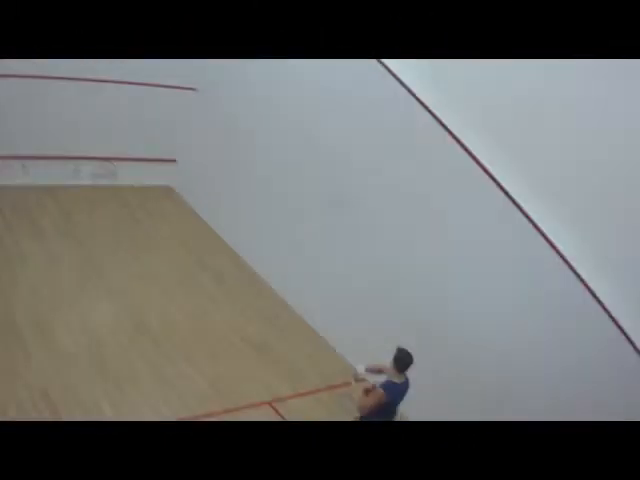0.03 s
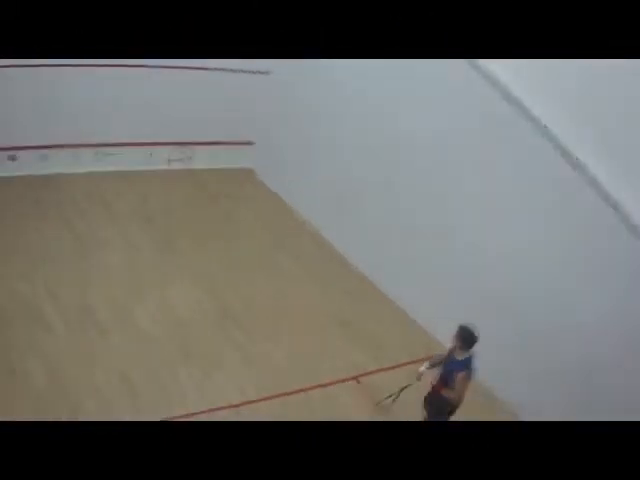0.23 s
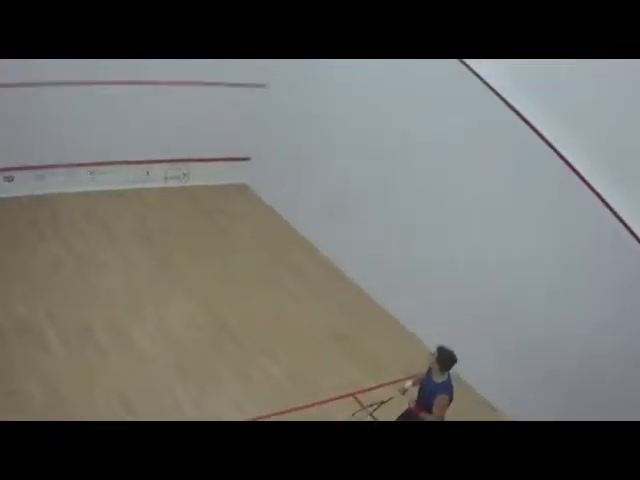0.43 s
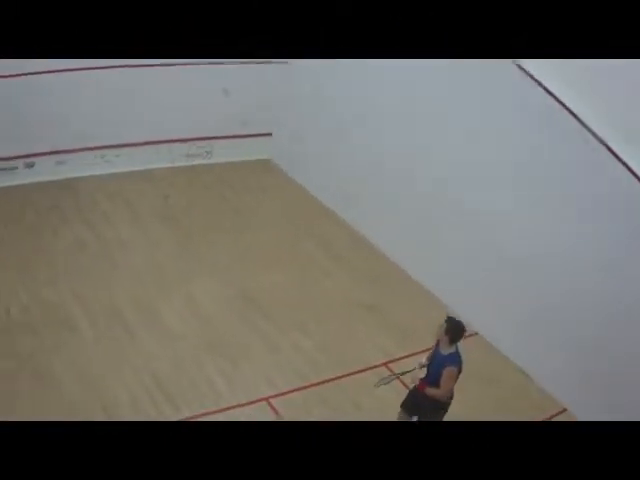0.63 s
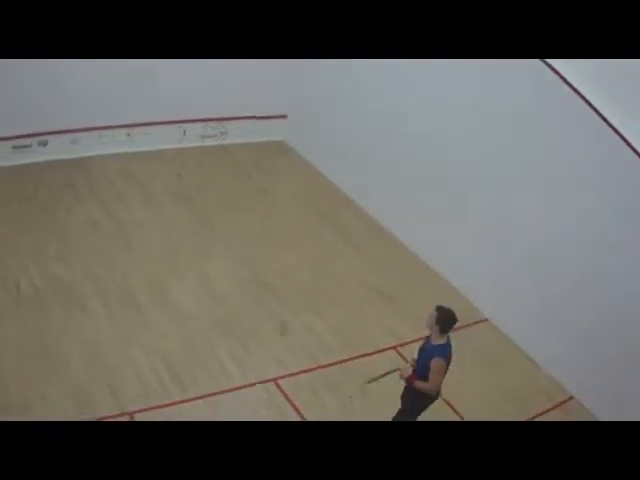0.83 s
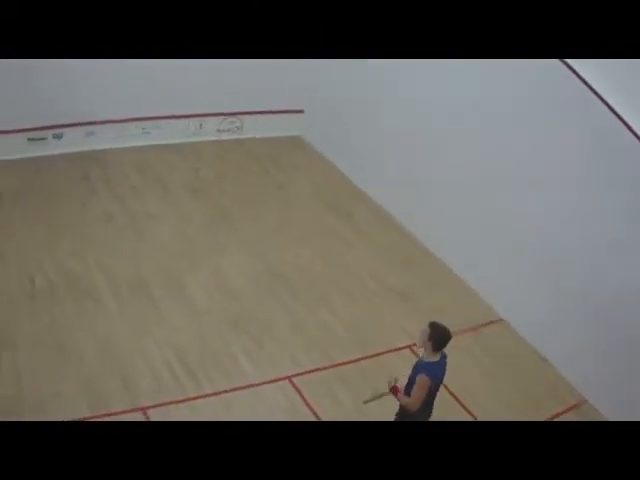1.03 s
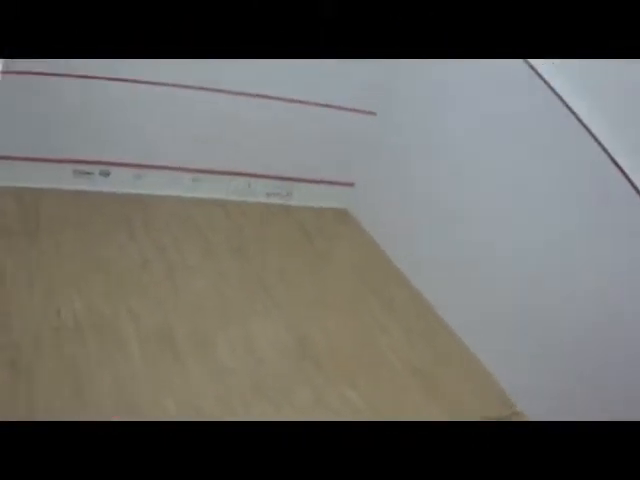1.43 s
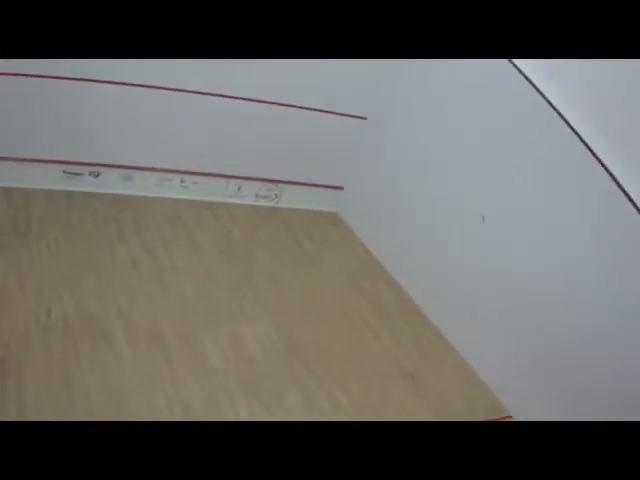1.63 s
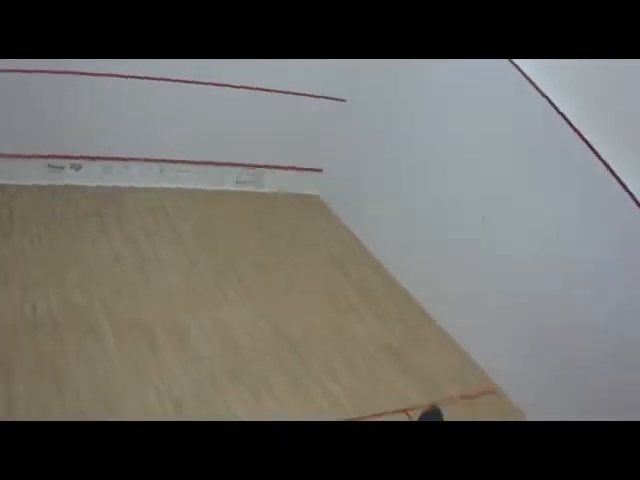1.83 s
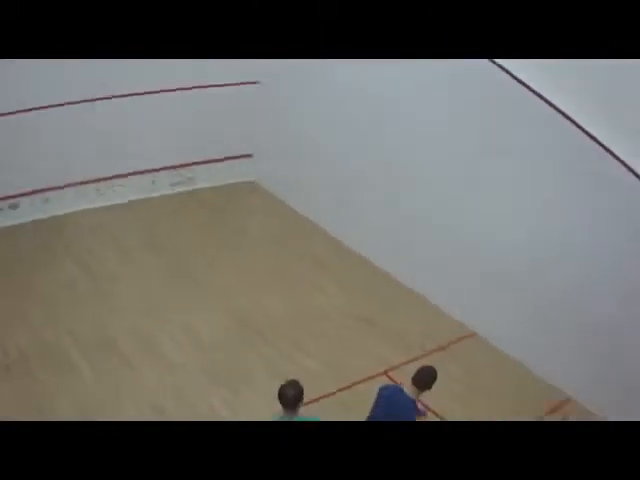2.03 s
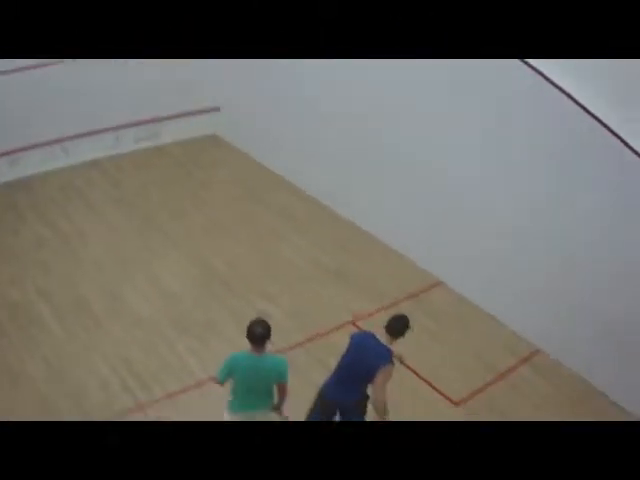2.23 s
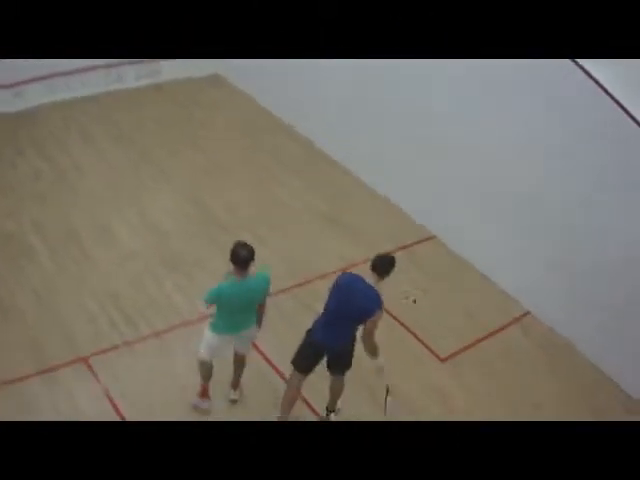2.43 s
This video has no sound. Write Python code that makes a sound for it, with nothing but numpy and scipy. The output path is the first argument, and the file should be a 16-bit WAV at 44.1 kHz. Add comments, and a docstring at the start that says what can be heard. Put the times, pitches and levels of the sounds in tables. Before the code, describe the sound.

Squash rally with racket thwacks, loud ball slams and shoe squeaks ringing around an indoor court.

```python
"""First comes the thwack of a racket on a squash ball, over faint ventilation and a barely audible thud.
The strings ring on each of three strokes; twice the ball slams into the front wall with a crack
and a short ping of its hollow shell. The wooden floor adds light knocks and an echo; soles squeak.
Heard from the gallery behind the court, the hard walls throw back distinct echoes,
then a long, bright wash of reverberation."""
import sys
import numpy as np
from scipy import signal
from scipy.fft import rfft, irfft
from scipy.io import wavfile

SR = 44100
rng = np.random.default_rng(int(sys.argv[2]) if len(sys.argv) > 2 else 0)


def materialize(psi):
    """Save the field psi as 16-bit PCM at rate SR to the path in sys.argv[1].

    A 1-D psi becomes a single channel; in a 2-D psi each row is a channel.
    """
    bounded = np.clip(np.atleast_2d(psi).T, -1, 1)
    quanta = np.round(bounded * 32767).astype(np.int16)
    wavfile.write(sys.argv[1], SR, quanta)


N = 110250
T = np.arange(N) / SR


def undb(db):
    """Turn decibels into a number to multiply a sound by."""
    return 10 ** (np.asarray(db) / 20)


def unit(x):
    """Scale a sound to an energy of one."""
    return x / np.sqrt(np.sum(x ** 2))


def curve(hz, points):
    """Join (frequency, value) points with straight lines, giving each octave equal room."""
    f, values = np.array(points, float).T
    return np.interp(np.log(np.maximum(hz, 1)), np.log(f), values)


def fade(t60):
    """A smooth fade that drops 60 dB in t60 seconds."""
    return np.exp(-np.log(1000) * T / t60)


def delay(x, s):
    """Start a sound s seconds later."""
    return np.concatenate([np.zeros(max(int(s * SR), 0)), x])[:N]


def convolve(x, response):
    """Pass a sound through a filter or a room, given how that answers a click."""
    return signal.fftconvolve(x, response)[:N]


def colour(points, bass_db=0, treble_db=0, bass_hz=600, treble_hz=3950, size=2048):
    """A click with the given tone colour, its bass and treble turned up or down."""
    hz = np.arange(size // 2 + 1) * SR / size
    gain = undb(curve(hz, points))
    bass = 1 / (1 + (hz / bass_hz / np.sqrt(2)) ** 4)
    treble = 1 - 1 / (1 + (hz * np.sqrt(2) / treble_hz) ** 4)
    gain = gain / np.sqrt(np.mean(gain ** 2)) * undb(bass_db * bass + treble_db * treble)
    # Pack the click's energy at its start without changing its colour.
    cepstrum = irfft(np.log(gain))
    cepstrum[1:size // 2] *= 2
    cepstrum[size // 2 + 1:] = 0
    return irfft(np.exp(rfft(cepstrum)))


def burst(fade_s):
    """The short puff of noise from a hit, evened out from low to high and then faded again."""
    spectrum = rfft(rng.standard_normal(N) * fade(fade_s))
    even = irfft(spectrum / (np.abs(spectrum) + 1e-9), N)
    return unit(even * fade(2 * fade_s))


def resonance(x, centre_hz, width_hz, attack_s=0.0014):
    """Keep the part of a sound near one pitch, with a soft start and an energy of one."""
    hz = np.arange(N // 2 + 1) * SR / N
    band = irfft(rfft(x) * np.exp(-((hz - centre_hz) / width_hz) ** 2), N)
    return unit(band * (1 - np.exp(-T / attack_s)))


# How long low and high sounds linger in the court: f/Hz, time to drop 60 dB/s
COURT_DECAY = [(80, 0.67), (300, 2.77), (1000, 2.8), (2000, 2.63), (3500, 2.72), (5400, 1.94), (7700, 1.42),
               (11000, 1.12), (15500, 1.34)]

def court(build_s=0.022, unevenness=0.32, early_db=-11):
    """Reverberation: countless reflections build up, fall quickly at first, and lose their treble."""
    steps = np.repeat(rng.standard_normal(N // 64 + 1), 64)[:N]
    strength = np.exp(unevenness * steps * fade(2))
    spectrum = rfft(rng.standard_normal(N) * strength)
    hz = np.arange(len(spectrum)) * SR / N
    centres = [f for f, _ in COURT_DECAY]
    tail = 0
    for weights, (_, t60) in zip(np.eye(len(centres)), COURT_DECAY):
        band = curve(hz, list(zip(centres, weights)))
        tail += irfft(spectrum * band, N) * fade(t60)
    swell = 1 - np.exp(-T / build_s)
    return unit(tail * swell * (1 + undb(early_db) * fade(1.0)))


# Tone colour of the moving air: f/Hz, level/dB
AIR_COLOUR = [(25, -24), (100, -6), (300, -4.5), (600, -1), (1200, -5.5), (2600, -8), (4000, -14),
              (6300, -19.5), (7800, -31), (9000, -39.5), (10500, -30), (13500, -24.5), (15500, -22)]

def ventilation(air_db=-57, ring_db=-67, ring_hz=4549):
    """Air rushes steadily with a thin hiss on top, while a faint high ring dies away."""
    air = undb(air_db) * convolve(rng.standard_normal(N), colour(AIR_COLOUR))
    return air + undb(ring_db) * fade(1.9) * np.sin(2 * np.pi * ring_hz * T)


def hand_bump(peak_s=0.07, half_width_s=0.022, hz=49.7, db=-66):
    """A hand nudges the camera and makes a soft, low thud."""
    age = T - peak_s
    return undb(db) * np.exp(-(age / half_width_s) ** 2) * np.sin(2 * np.pi * hz * age)


# Racket strokes: t/s, level/dB, direct sound/dB, bass/dB, treble/dB, string ring/dB,
# length of the direct sound/s, wait for the court's answer/s
STROKES = [(0.072, -3.5, 1.5, 1, -1, -2, 0.023, .025), (1.0246, -2, -1.5, 1.5, 2.5, -17, .004, 0.02),
           (2.200, -14, -1.5, 2.5, -0.5, 0.5, 0.0083, .025)]
# Notes of the strings and frame: f/Hz, level/dB, time to drop 60 dB/s
RACKET_NOTES = [(374, -11.5, 0.078), (804, -11, .035), (919, -3.5, 0.072), (1080, -7, .04),
                (1670, 2, 0.042), (2310, -7, 0.041), (3005, 0.5, 0.035), (5200, -17, .02)]
# Tone colours of the blow and of its bright tick: f/Hz, level/dB
BLOW_COLOUR = [(50, -33.5), (150, -19), (400, 1), (650, -6), (1000, 5), (1350, -10.5), (2800, -3.5),
               (3400, -13), (4400, -12.5), (5400, -10.5), (7000, -26), (9000, -45), (11500, -42.5),
               (15500, -37)]
TICK_COLOUR = [(500, -20), (3000, -17), (6500, 1), (9000, -4), (13000, -8), (15500, -22)]

def racket():
    """The ball thwacks the strings; floor and side wall smear the blow, then the far court answers."""
    string_band = signal.butter(3, (290, 6000), "band", fs=SR, output="sos")
    notes = sum(undb(db) * fade(t60) * np.sin(2 * np.pi * hz * T) for hz, db, t60 in RACKET_NOTES)
    ring = unit(signal.sosfilt(string_band, notes))
    out = 0
    for s, db, direct_db, bass_db, treble_db, ring_db, length_s, wait_s in STROKES:
        strings = undb(ring_db) * ring
        tick = undb(treble_db - 37.5) * convolve(burst(0.041), colour(TICK_COLOUR))
        blow = colour(BLOW_COLOUR, bass_db, treble_db)
        stroke = tick + undb(-6.5) * strings  # these reach the ear with no smearing
        for source in (blow, undb(-3) * strings):
            direct = unit(burst(0.3) * np.exp(-(T / length_s) ** 8))
            smear = undb(-10) * burst(0.3)
            far = delay(court(build_s=0.0021), wait_s)
            path = undb(direct_db - 10.5) * (direct + smear) + far
            stroke = stroke + convolve(path, source)
        out += undb(db) * delay(stroke, s)
    return out


# Hits on the front wall: t/s, level/dB, direct sound/dB, bass/dB, treble/dB,
# hollow note's f/Hz, hollow note's level/dB
SLAMS = [(0.2681, 11.5, -1, -1.5, -1, 930, -7.5), (1.3084, 9, -2, -1, -2, 1146, -5)]
# Echoes from side walls, ceiling and back wall: t/s after the hit, level/dB
ECHOES = [(.0245, -14), (.032, -26), (.057, -37), (.069, -20), (0.076, -14), (.083, -36), (.103, -16),
          (.144, -24)]
# Tone colours of the crack and of the boom after it: f/Hz, level/dB
CRACK_COLOUR = [(60, -33), (300, -1.5), (700, 4), (1600, 1.5), (2600, 4), (3500, -4), (5200, -8.5),
                (7000, -19), (9000, -44), (11000, -28.5), (15500, -54)]
BOOM_COLOUR = [(50, -32), (130, -20.5), (300, -10.5), (520, -2.5), (720, -3.5), (1080, 1), (1600, -4),
               (2200, -7.5), (2850, -6.5), (3300, -17), (3900, -15), (4450, -19), (5300, -14), (6500, -27),
               (7800, -37.5), (8900, -50), (11000, -45.5), (15500, -52)]

def front_wall():
    """The ball cracks against the wall; echoes and a swelling boom follow with its hollow note."""
    out = 0
    for s, db, direct_db, bass_db, treble_db, hollow_hz, hollow_db in SLAMS:
        snap = undb(-10.5) * (T == 0)
        contact = snap + burst(0.21)
        crack = undb(direct_db - 7) * convolve(contact, colour(CRACK_COLOUR, bass_db, treble_db))
        echoes = sum(undb(echo_db) * delay(burst(0.026), lag_s) for lag_s, echo_db in ECHOES)
        room = delay(court(), 0.004) + echoes
        boom = convolve(room, colour(BOOM_COLOUR, bass_db, treble_db))
        hollow = undb(hollow_db) * delay(resonance(court(), hollow_hz, width_hz=290), 0.024)
        out += undb(db) * delay(crack + boom + hollow, s)
    return out


# Pings of the ball and their first reflections: t/s at the peak, level/dB, f/Hz, half-width/s
PINGS = [(.2757, -13.5, 2540, 0.0011), (.2795, -18, 2240, 0.0015), (1.3149, -13, 2330, 0.00033),
         (1.3166, -17, 2836, 0.0008), (1.3193, -11.5, 2060, 0.00069)]

def ball_pings(room_db=-7.5):
    """The squashed shell springs back with a ping just a few vibrations long."""
    pings = 0
    for s, db, hz, half_width_s in PINGS:
        age = T - s
        pings += undb(db) * np.exp(-(age / half_width_s) ** 2) * np.sin(2 * np.pi * hz * age)
    return pings + undb(room_db) * convolve(pings, court())


# Floor knocks and, in row 3, a stroke's echo: t/s, level/dB, direct sound/dB, bass/dB, treble/dB
KNOCKS_AND_ECHO = [(.655, -2, -14, -6, -25), (.83, -7.5, -17, -2.5, -19), (1.0345, -6, 9, -1.5, 6.5),
                   (1.73, -7.5, -10, -2, -33.5), (2.202, -20.5, 5, 2, 11), (2.248, -20, 7, -1, -6),
                   (2.274, -26.5, 8.5, 4, 19)]
# Their tone colour: f/Hz, level/dB
FLOOR_COLOUR = [(60, -22), (150, -6.5), (300, -9), (500, 8.5), (1100, 5), (1600, 3.5), (2600, -5),
                (3500, -15), (5400, -12.5), (8800, -50), (15000, -51)]

def floor_knocks_and_echo():
    """Shoes and ball knock on the boards, and the second racket stroke echoes sharply off the floor."""
    out = 0
    for s, db, direct_db, bass_db, treble_db in KNOCKS_AND_ECHO:
        path = undb(direct_db - 10) * burst(0.041) + court()
        sound = convolve(path, colour(FLOOR_COLOUR, bass_db, treble_db))
        out += undb(db) * delay(sound, s)
    return out


# Shoe squeaks and, in row 3, ringing strings: t/s, level/dB, direct sound/dB, f/Hz, pitch spread/Hz
SQUEAKS_AND_RING = [(1.378, -14.5, -8, 5150, 450), (1.47, -11, -23, 5150, 308),
                    (2.201, -16.5, -4, 2964, 350), (2.248, -10.5, 1, 2250, 600), (2.274, -27, 1, 5150, 600)]

def squeaks_and_string_ring():
    """Soles squeak and scuff, and the racket strings ring brightly on the third stroke; both linger."""
    out = 0
    for s, db, direct_db, hz, width_hz in SQUEAKS_AND_RING:
        path = undb(direct_db) * burst(0.028) + court()
        out += undb(db) * delay(resonance(path, hz, width_hz), s)
    return out


def scene():
    """Add the rally and the quiet sounds behind it into one channel."""
    rally = racket() + front_wall() + ball_pings() + floor_knocks_and_echo() + squeaks_and_string_ring()
    return (rally + hand_bump() + ventilation())[None]


def record(dry, top_hz=15200):
    """The camera cuts off the very highest treble."""
    return signal.sosfilt(signal.ellip(10, .2, 70, top_hz, fs=SR, output="sos"), dry)


dry = scene()
out = record(dry)
materialize(out)
```